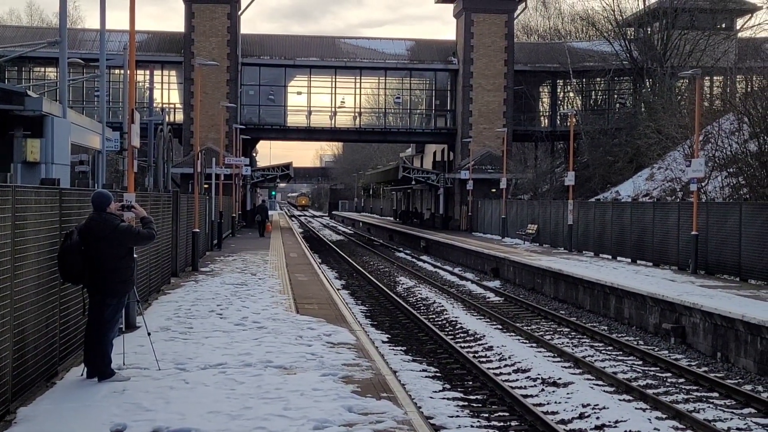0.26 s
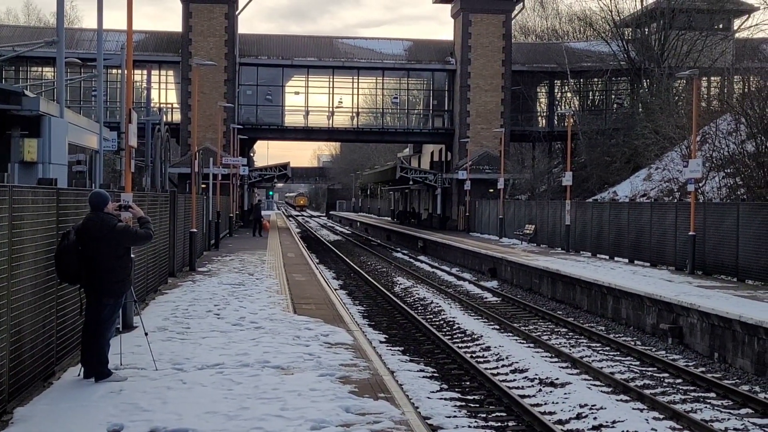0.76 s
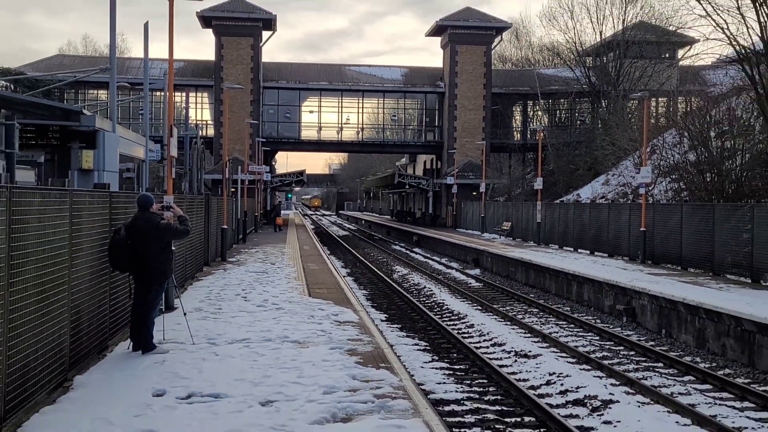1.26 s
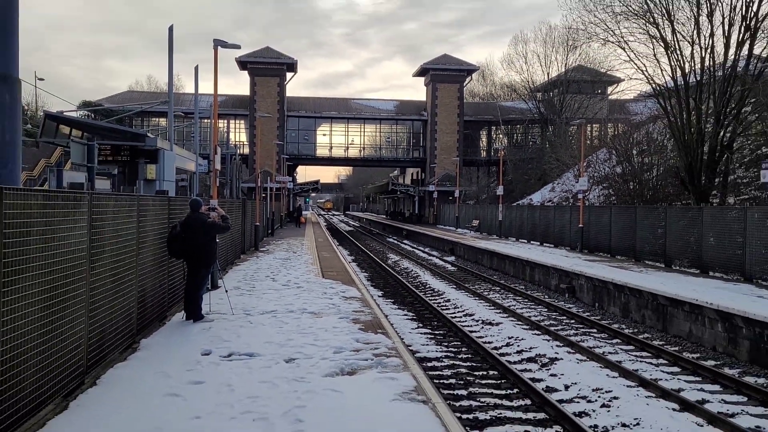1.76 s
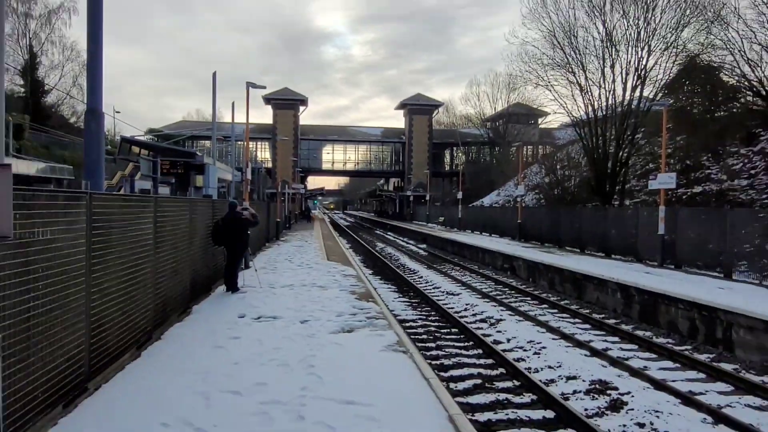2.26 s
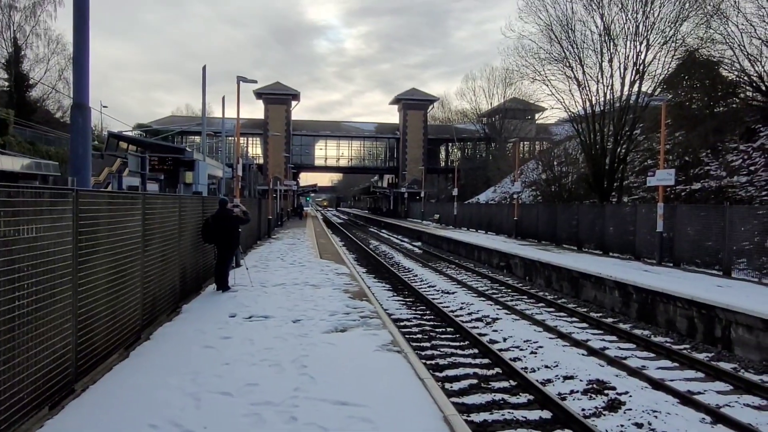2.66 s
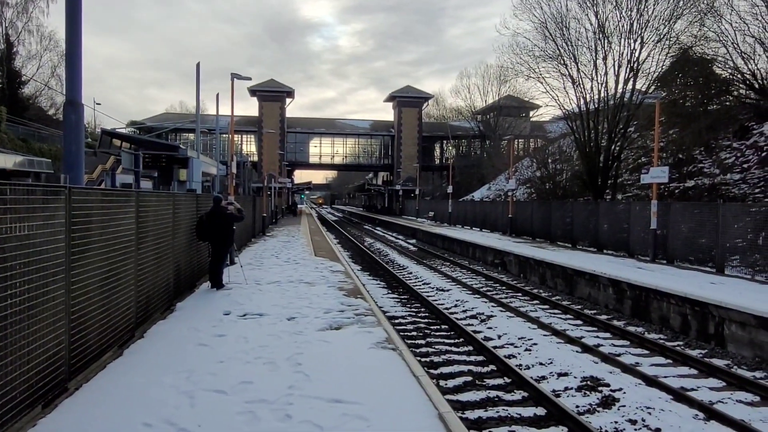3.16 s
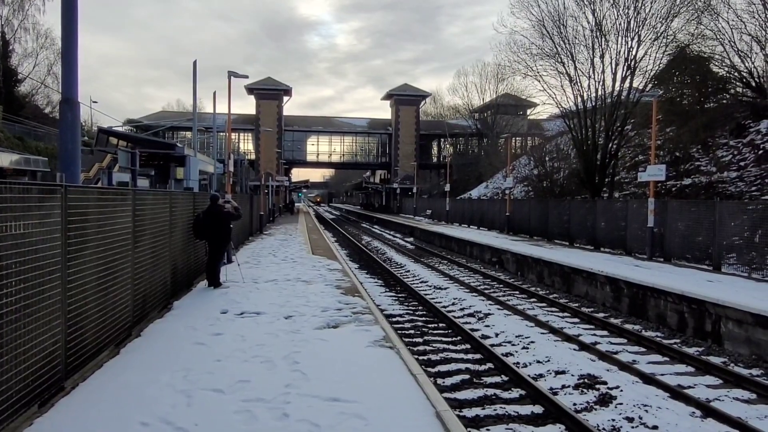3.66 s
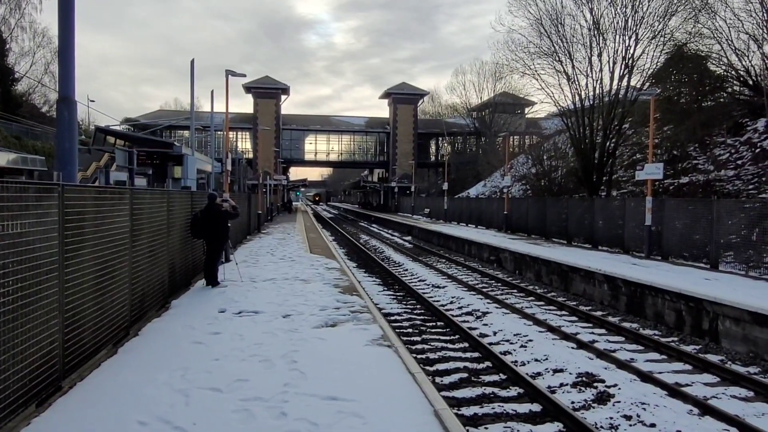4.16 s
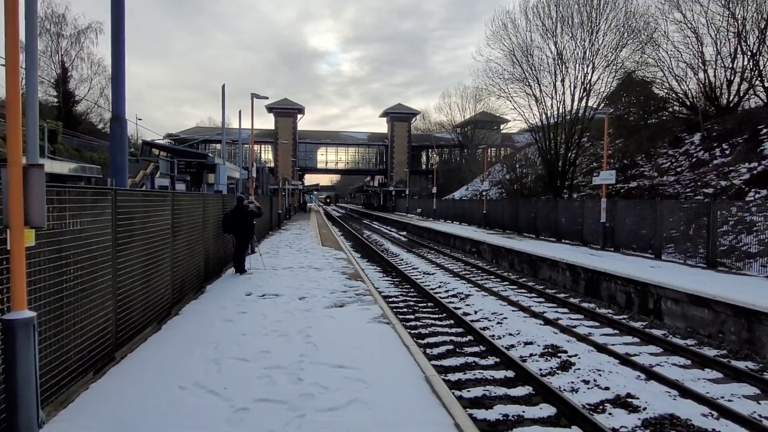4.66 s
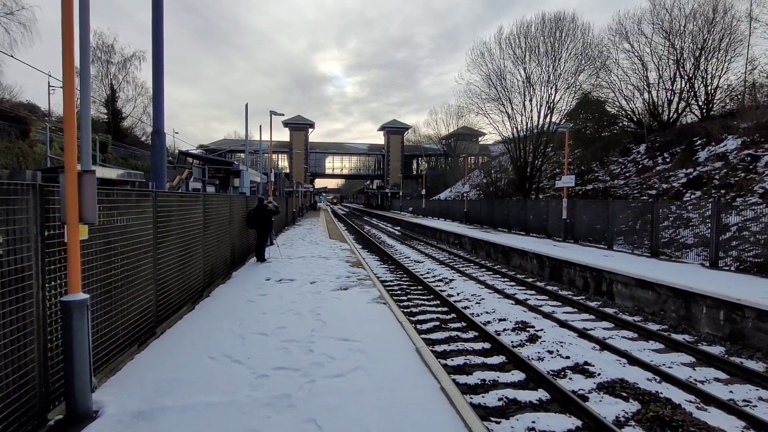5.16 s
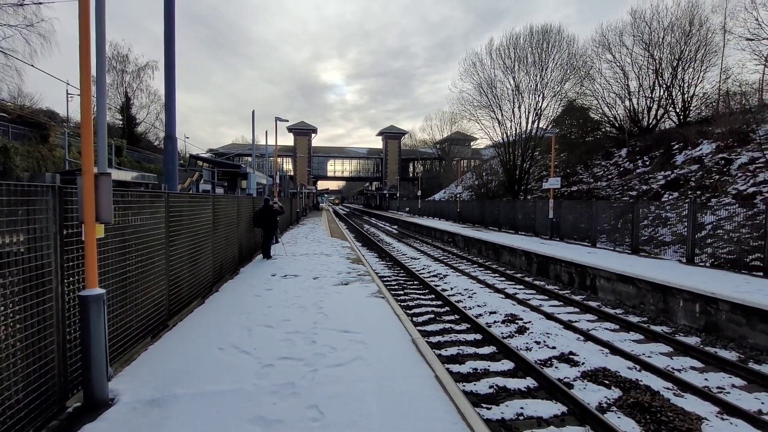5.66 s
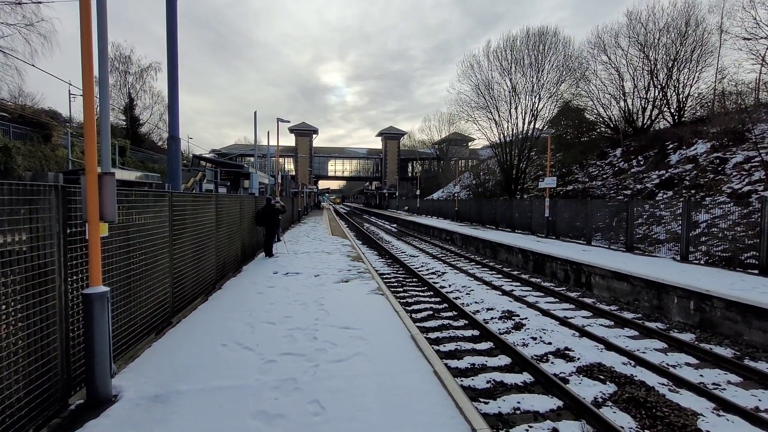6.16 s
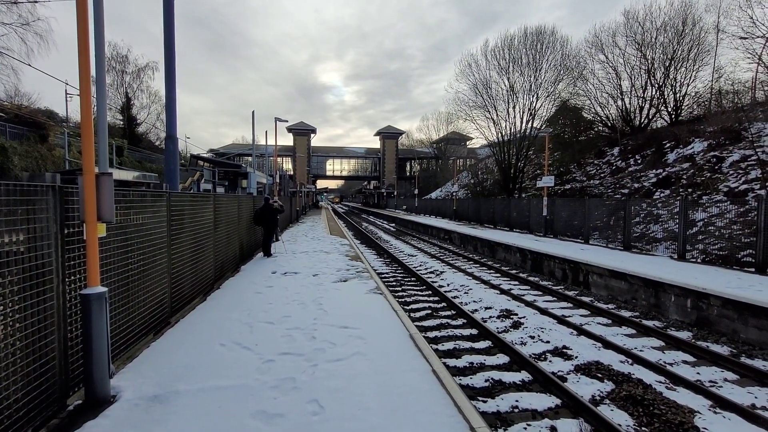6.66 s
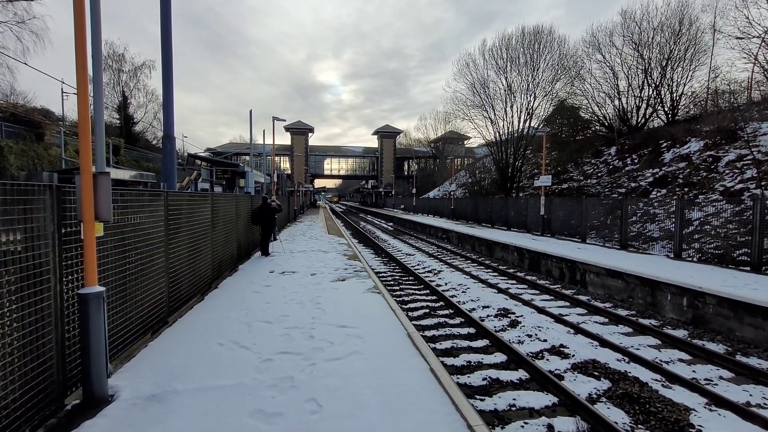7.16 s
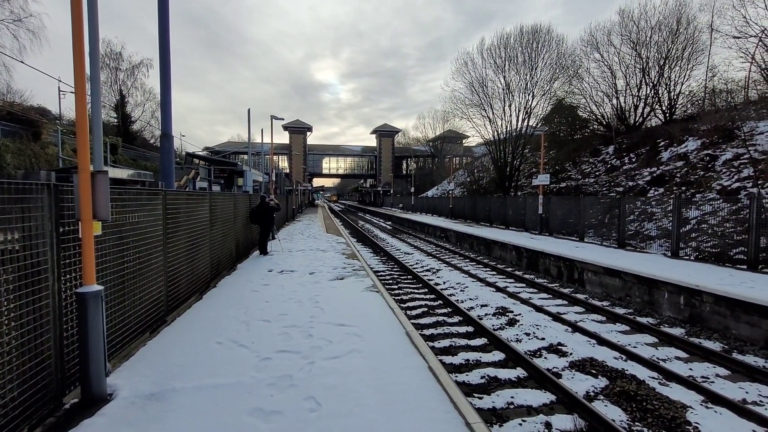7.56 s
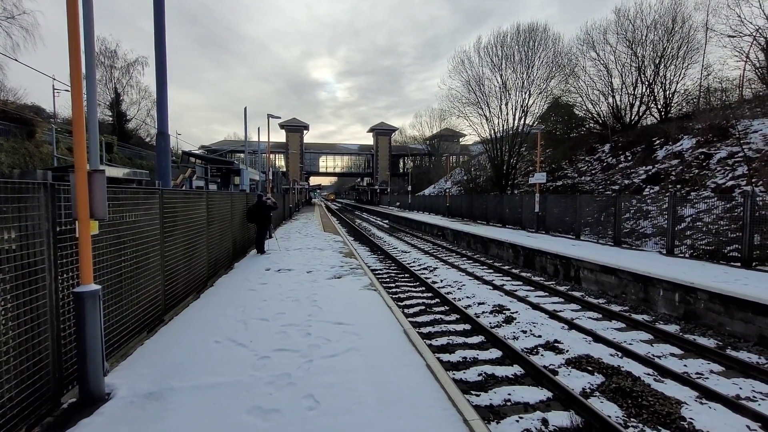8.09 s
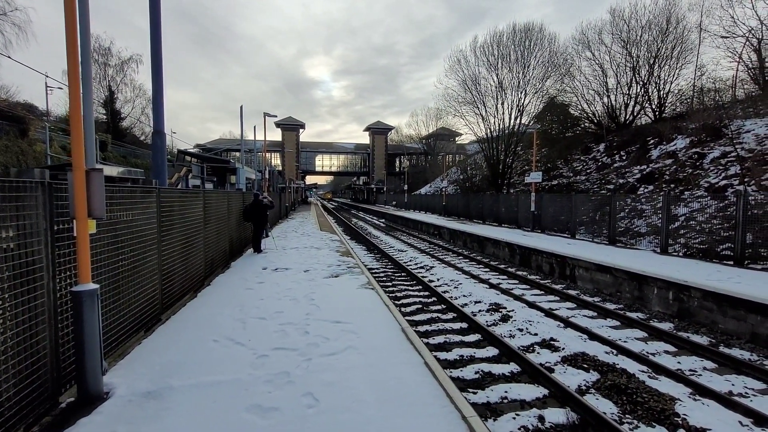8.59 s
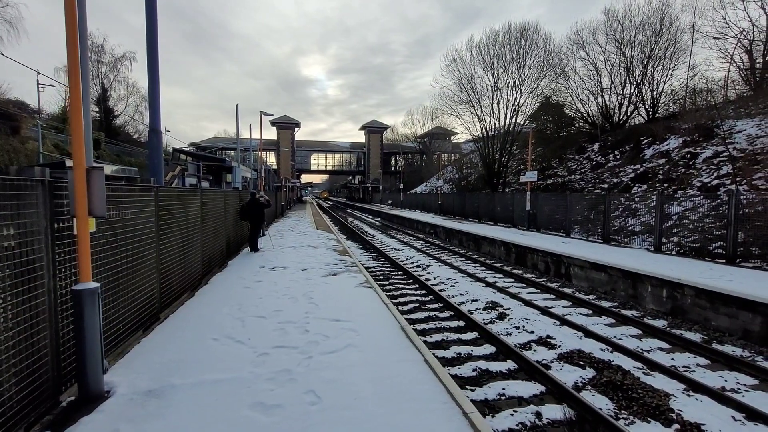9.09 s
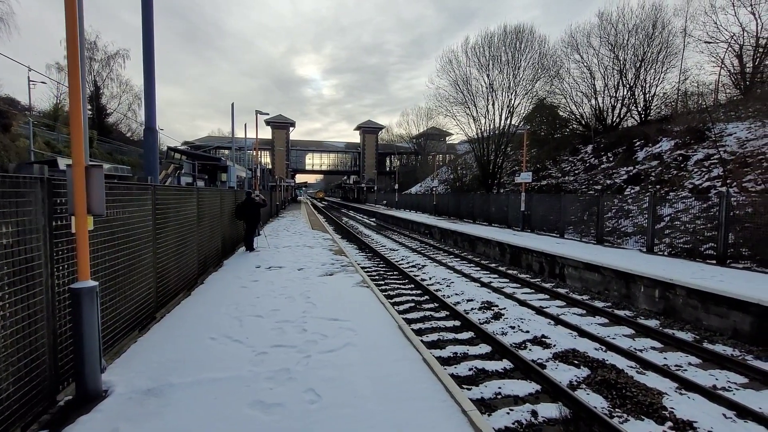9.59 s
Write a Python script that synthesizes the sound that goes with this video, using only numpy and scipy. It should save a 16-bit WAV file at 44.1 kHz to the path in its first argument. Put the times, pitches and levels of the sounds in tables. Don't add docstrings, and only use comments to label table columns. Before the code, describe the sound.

Hard-working train engines approach through an echoing cutting, hoarse pulsing exhaust swelling over bird whistles, clanks and knocks, then a finger bumps the microphone twice.

```python
import sys
import numpy as np
from scipy import signal
from scipy.fft import rfft, irfft, next_fast_len
from scipy.io import wavfile
from scipy.ndimage import uniform_filter1d, map_coordinates

SR = 44100
rng = np.random.default_rng(int(sys.argv[2]) if len(sys.argv) > 2 else 0)


def materialize(psi):
    bounded = np.clip(np.atleast_2d(psi).T, -1, 1)
    quanta = np.round(bounded * 32767).astype(np.int16)
    wavfile.write(sys.argv[1], SR, quanta)


def ratio_of_db(decibels):
    return 10 ** (np.asarray(decibels, float) / 20)


N = 433503


def seconds():
    return np.arange(N) / SR


def unit(x):
    return x / np.sqrt(np.mean(x ** 2) + 1e-20)


def sine(turns):
    return np.sqrt(2) * np.cos((2 * np.pi * (turns % 1)).astype(np.float32))


def along(points, hz):
    point_hz, value = np.transpose(points)
    return np.interp(np.log(hz + 1), np.log(point_hz + 1), value)


def curves(rows):
    start_s, *columns = np.transpose(rows)
    return [np.interp(seconds(), start_s, column) for column in columns]


def wobble(rate):
    count = int(N * rate / SR) + 2
    return np.interp(np.arange(N) * rate / SR, np.arange(count), rng.standard_normal(count))


def filtered(x, response):
    size = next_fast_len(N + 8192)
    return irfft(rfft(x, size) * response(np.fft.rfftfreq(size, 1 / SR)), size)[..., :N]


def rush(spectrum, patchy_db):
    bins = signal.stft(rng.standard_normal((2, N)), nperseg=512)[2]
    field = uniform_filter1d(rng.standard_normal(bins.shape[1:]), size=5, axis=0)
    field = uniform_filter1d(field, size=8, axis=1)
    pair = signal.istft(bins * ratio_of_db(patchy_db * unit(field)), nperseg=512)[1][:, :N]
    points = [(10, -120), *spectrum, (20000, -120)]
    return unit(filtered(pair, lambda hz: ratio_of_db(along(points, hz))))


def orders(multiples, levels, turns, nearness, fade_db):
    out, knots = 0, np.arange(0, N, SR // 10)
    for multiple, (far_db, near_db) in zip(multiples, levels):
        start = rng.random()
        fade = np.interp(knots * 1.3 / SR, np.arange(15), rng.standard_normal(15))
        level_db = far_db + (near_db - far_db) * nearness[knots] + fade_db * fade
        level = np.interp(np.arange(N), knots, ratio_of_db(level_db))
        out = out + level * sine(multiple * turns + start)
    return out


# start_s, lead_clear [0-1], rear_clear [0-1]
BRIDGE_CLEARANCE = [(0, -.2, 0), (2, -.1, 0.3), (3.4, 0.3, .05), (4.3, 0.25, 0.1), (5, 0.38, .05),
                    (5.6, 0.5, 0), (6.3, 0.73, 0), (6.8, 0.9, 0.8), (7.2, 0.85, 0.8), (7.6, 0.9, 0.9),
                    (8.1, 0.9, 0.99), (9, 1.02, 0.5), (9.83, 0.9, 0.2)]
LEAD_MULTIPLES = [8, 10, 11, 12, 13, 14, 15, 16, 17, 18, 19, 21, 22, 23, 24, 25, 28, 29, 30, 31, 33, 34, 35,
                  36, 40, 42, 46]
REAR_MULTIPLES = [6, 18, 22, 32, 34]
# far_db, near_db
LEAD_TONE_LEVELS = [(-49, -50.5), (-53, -45.5), (-54, -41.5), (-54, -44.5), (-58.5, -56.5), (-62.5, -40.5),
                    (-65.5, -48.5), (-55.5, -50), (-51, -46), (-46.5, -35.5), (-59.5, -58.5), (-60, -55.5),
                    (-52, -36), (-51.5, -36), (-61.5, -41.5), (-58, -49), (-67.5, -47), (-59, -37.5),
                    (-58.5, -47.5), (-53.5, -48), (-55.5, -43.5), (-55.5, -45.5), (-52.5, -49.5),
                    (-64.5, -48.5), (-60.5, -53), (-63.5, -53), (-56, -45.5)]
REAR_TONE_LEVELS = [(-66, -59), (-55.5, -39.5), (-59.5, -41.5), (-67, -56), (-57, -39.5)]
# start_s, level_db
LEAD_BOOM = [(0.0, -38), (0.44, -37.5), (1.51, -37.5), (1.78, -41), (2.16, -33.5), (2.71, -39.5),
             (3.01, -35.5), (3.28, -36), (3.55, -34), (4.02, -35), (4.35, -32.5), (4.95, -43.5),
             (5.61, -29), (6.0, -35), (6.8, -29.5), (7.3, -35.5), (7.7, -39.5), (8.5, -35), (9, -43.5),
             (9.83, -44.5)]
# start_s, level_db
LEAD_THUD = [(0, -53), (.9, -49), (2.2, -49.5), (3.3, -47.5), (4.2, -43), (5.3, -44), (6, -40.5),
             (6.9, -46), (7.8, -49), (8.3, -47), (9.83, -43)]
# start_s, level_db
REAR_ENGINE_BOOM = [(0, -59), (2, -50), (3, -54), (4.2, -47.5), (5, -55), (6.1, -49.5), (6.5, -40),
                    (7, -31.5), (7.5, -34), (8.5, -35.5), (9, -42), (9.83, -43.5)]


def exhaust(turns, rear_turns):
    lead_near, rear_near = curves(BRIDGE_CLEARANCE)
    tones = orders(LEAD_MULTIPLES, LEAD_TONE_LEVELS, turns, lead_near, fade_db=1.8)
    tones = tones + orders(REAR_MULTIPLES, REAR_TONE_LEVELS, rear_turns, rear_near, fade_db=3.5)
    for fading, crank in ((LEAD_BOOM, 9 * turns), (LEAD_THUD, 6 * turns), (REAR_ENGINE_BOOM, 9 * rear_turns)):
        tones = tones + ratio_of_db(curves(fading)[0]) * sine(crank)
    longer_path = np.pad(tones, (190, 0), "reflect")[:N]
    return np.array([tones, longer_path])


# start_s, roar_db
EFFORT = [(0, -42.5), (.68, -41), (1.2, -42), (2.05, -41), (2.96, -39), (3.31, -39.5), (3.97, -38),
          (4.71, -36), (5.06, -34.5), (5.67, -32), (6.02, -31.5), (6.43, -34.5), (7.36, -33.5), (8.05, -34),
          (8.71, -32), (9.83, -32.5)]
# start_s, deep_db, bright_db
NOISE_DRIFT = [(0, 0.3, -0.5), (1, 0.6, 1.6), (2, 2.1, 1), (2.9, 0.3, 1.5), (3.6, -1, -0.2),
               (4.2, -1, -0.3), (4.9, 0.3, -3.5), (5.2, 1.1, 1), (6, -0.1, 1.3), (7, 0.5, 0.3),
               (7.6, -0.2, -0.7), (8.3, 1.1, 1.7), (9, 0.5, 0.2), (9.83, -0.8, 1.5)]
# pitch_hz, level_db [dB per Hz]
RUMBLE_COLOUR = [(22, -31.5), (36, -21), (60, -1.5), (95, -8), (150, -1.5), (190, -10.5), (230, -5.5),
                 (290, -8), (400, -14.5), (600, -37.5)]
THROAT_COLOUR = [(250, -31.5), (340, -11.5), (420, -2), (500, 1.5), (600, -9), (750, -27.5)]
ROAR_COLOUR = [(450, -20.5), (600, -1.5), (720, 1.5), (900, -4), (1150, -6.5), (1550, -6.5), (1800, -13.5),
               (2100, -14), (2500, -27.5), (3500, -65)]
CLATTER_COLOUR = [(1800, -26.5), (2400, 3.5), (3200, 1), (4000, -3), (5000, -10), (5700, -18), (6500, -43)]
FIZZ_COLOUR = [(3300, -30), (4000, -3), (4600, -2.5), (5300, -6), (5900, -19.5)]
AIR_COLOUR = [(4800, -26), (5700, 4), (6800, -2.5), (7800, -9), (8400, -25), (9300, -17.5), (9900, -9.5),
              (10500, -29.5), (12000, -39.5)]


def firing_noise(turns):
    angle = 2 * np.pi * (6 * turns + 0.46)
    firing = np.sin(angle) + 0.78 * np.sin(2 * angle)
    uneven = np.cos(angle / 2 + 3.1)
    roar_db, = curves(EFFORT)
    deep_db, bright_db = curves(NOISE_DRIFT)
    surge = wobble(3.8)

    def follow(start_db, per_effort_db, per_s_db):
        return start_db + per_effort_db * (roar_db - roar_db[0]) + per_s_db * seconds()

    rumble_db = follow(-44.5, 0.72, 0.54) + deep_db + 0.86 * wobble(6.0)
    throat_db = follow(-51, 0.78, 1) + deep_db + 2.1 * wobble(2.9) + 0.21 * uneven + 0.11 * wobble(65)
    roar_gate_db = roar_db + 0.3 + 1.1 * firing + 0.7 * uneven + 0.3 * surge + 0.6 * wobble(70)
    clatter_db = follow(-63, 0.61, 0.87) + bright_db + 0.99 * firing + 0.18 * uneven
    clatter_db += 0.35 * surge + 1.5 * wobble(90)
    fizz_db = follow(-80.5, 0.77, 2.06) + bright_db + 1.4 * firing + 0.7 * wobble(80)
    air_db = follow(-91.5, 1.16, 2.52) + 0.9 * firing + 0.73 * wobble(7.8)

    noise = ratio_of_db(rumble_db) * rush(RUMBLE_COLOUR, patchy_db=2.15)
    noise += ratio_of_db(throat_db) * rush(THROAT_COLOUR, patchy_db=0.96)
    noise += ratio_of_db(roar_gate_db) * rush(ROAR_COLOUR, patchy_db=1.5)
    noise += ratio_of_db(clatter_db) * rush(CLATTER_COLOUR, patchy_db=1.5)
    noise += ratio_of_db(fizz_db) * rush(FIZZ_COLOUR, patchy_db=3.5)
    noise += ratio_of_db(air_db) * rush(AIR_COLOUR, patchy_db=3.5)
    return noise


# start_s, rate_hz [cycles a second]
LEAD_CYCLE = [(0, 7.155), (5.6, 7.155), (6.3, 7.147), (9.83, 7.147)]


def engines():
    turns = -0.025 + np.cumsum(curves(LEAD_CYCLE)[0]) / SR
    rear_turns = 0.069 + 6.6 * seconds()
    opening = np.minimum(seconds() / 0.01, 1)
    return opening * (exhaust(turns, rear_turns) + firing_noise(turns))


# start_s, level_db, pitch_hz
TURBO_WHINE = [(0, -81, 4829), (3.5, -75, 4829), (4.4, -71.5, 4829), (5.7, -71.5, 4819), (6.6, -67.5, 4822),
               (7.4, -66.5, 4828), (9, -66, 4828), (9.83, -65, 4822)]


def whine(turns, level_db, blur):
    phase = 2 * np.pi * (turns % 1) + blur + np.array([[0], [1.2]])
    return ratio_of_db(level_db + 2.2 * wobble(9)) * np.sin(phase.astype(np.float32))


def turbos():
    level_db, turbo_hz = curves(TURBO_WHINE)
    t = seconds()
    lead = whine(np.cumsum(turbo_hz) / SR, level_db, 1.1 * wobble(30))
    rear = whine(3651 * t, level_db - 4, 1.1 * wobble(30))
    howl_db = -63 - 6 * ((t - 5.06) / 0.82) ** 2
    gears = whine(3340 * t, howl_db, 1.8 * wobble(260))
    return np.sqrt(2) * (lead + rear + gears)


# pitch_hz, level_db
HISS_COLOUR = [(100, -10), (4000, -2), (8000, 0), (15500, 3)]


def phone_hiss():
    return ratio_of_db(-81.5 - 0.3 * seconds()) * rush(HISS_COLOUR, patchy_db=1.2)


def blows(events, trim_db, t60):
    out, t = np.zeros(N + SR), np.arange(SR // 10) / SR
    for start_s, peak_db, pitch_hz in events:
        swell = 1 - np.exp(-t / 0.0012)
        ring = np.sin(2 * np.pi * pitch_hz * t) * ratio_of_db(peak_db + trim_db - 60 * t / t60) * swell
        out[round(start_s * SR):][:len(t)] += ring
    direct = out[:N]
    return np.array([direct, np.roll(direct, 170)])


# start_s, peak_db, pitch_hz
COUPLING_CLINKS = [(0.4544, -33.5, 1405), (0.615, -35.5, 1480), (3.69, -27, 1600), (4.0677, -37, 1320),
                   (5.1627, -25, 1530), (5.1836, -27, 1400), (5.2086, -27.5, 1350), (5.278, -29.5, 1410),
                   (5.3023, -35, 1360), (5.4645, -42, 1470), (5.8217, -24.5, 1384), (5.9738, -28, 1470),
                   (6.3, -32, 1430), (6.535, -30, 1480), (6.558, -36, 1410), (6.6716, -33, 1640),
                   (6.721, -28.5, 1356), (6.999, -26.5, 1570), (7.467, -27, 1440), (8.3055, -27, 1447),
                   (0.72, -34.5, 1680), (2.5, -32.5, 1600), (2.9, -31, 1120), (3.135, -28.5, 1630),
                   (3.25, -31.5, 1570), (3.47, -32, 1430)]
# start_s, peak_db, pitch_hz
COUPLING_PINGS = [(4.6505, -50, 3130), (4.7887, -42, 2850), (5.1896, -44, 3340), (5.3923, -45, 3150),
                  (5.8922, -45, 3120), (6.0194, -41, 2850), (6.0483, -39, 3330), (6.164, -51, 3080),
                  (6.184, -36, 3070), (6.605, -45, 3130)]


def couplings():
    return blows(COUPLING_CLINKS, trim_db=6.0, t60=0.026) + blows(COUPLING_PINGS, trim_db=4.5, t60=0.041)


def whistle(notes, shift_s, pace):
    out = np.zeros(N + SR)
    flutter, quaver = ratio_of_db(2.5 * wobble(90)), 1 + 0.007 * wobble(150)
    for start_s, length_s, start_hz, mid_hz, end_hz, level_db in notes:
        u = np.linspace(0, 1, round(length_s * SR))
        at = round((start_s * pace + shift_s) * SR)
        hz = start_hz * (1 - u) * (1 - 2 * u) + 4 * mid_hz * u * (1 - u) + end_hz * u * (2 * u - 1)
        tone = np.sin(2 * np.pi * np.cumsum(hz * quaver[at:][:len(u)]) / SR)
        swell = np.abs(np.sin(np.pi * u)) ** 0.32
        out[at:][:len(u)] += ratio_of_db(level_db + 1.0) * swell * tone
    return out[:N] * flutter


def cutting(x, t60):
    t, out = np.arange(SR // 2) / SR, np.zeros((2, N + SR))
    first, last = np.flatnonzero(x)[[0, -1]]
    tail = rng.standard_normal((2, len(t))) * ratio_of_db(-60 * t / t60) * (1 - np.exp(-t / 0.012))
    echo = signal.fftconvolve(x[None, first:last], tail / np.linalg.norm(tail[0]), axes=1)
    out[:, first:first + echo.shape[1]] = echo
    return out[:, :N]


# start_s, length_s, start_hz, end_hz, level_db
GLIDING_NOTES = [(1.238, .026, 4400, 3600, -61), (1.476, .013, 4300, 5250, -56),
                 (1.712, .013, 6300, 5880, -62), (1.726, .013, 6300, 5880, -62),
                 (1.74, .048, 7050, 5700, -61), (1.82, .012, 5000, 5900, -60),
                 (2.112, .014, 4800, 4250, -61), (2.186, .07, 5250, 4420, -52),
                 (2.44, .08, 5580, 5000, -58), (2.686, .021, 4000, 5100, -56),
                 (2.707, .009, 5000, 4500, -54), (2.716, .02, 4300, 5050, -55),
                 (2.752, .013, 4300, 5200, -59), (2.765, .021, 5250, 4200, -56),
                 (2.833, .01, 4900, 4300, -53)]
# start_s, length_s, top_hz, depth_hz, level_db
ARCHED_NOTES = [(1, .1, 5180, 110, -59), (1.451, .025, 4900, 620, -56), (1.489, .03, 5260, 60, -57),
                (1.558, .024, 5500, 800, -56), (1.588, .026, 5250, 1100, -52),
                (1.806, .015, 4950, 250, -55), (1.861, .04, 5480, 260, -58), (1.95, .035, 4450, 600, -57),
                (2.126, .025, 4870, 50, -60), (2.345, .025, 5960, 300, -67), (2.358, .08, 5590, 220, -60)]
# start_s, length_s, start_hz, end_hz, level_db
HOOKED_NOTES = [(1.405, .043, 6420, 5000, -60), (1.832, .028, 5950, 5200, -59),
                (1.987, .016, 4450, 3850, -59), (2.012, .034, 4800, 3600, -56),
                (2.082, .025, 4850, 3700, -56)]
# start_s, length_s, start_hz, mid_hz, end_hz, level_db
FIRST_FLOURISH = (1.623, .035, 4150, 4560, 4080, -53)
# first_db, second_db
NOTE_STRESS = [(1, -6), (2, -1), (1, 2), (1, 1), (0, -0.5), (-3, 6), (-4, 3), (1, 3.5), (-1, 0), (0, 4),
               (2, 2), (-1, 0), (-1, -3), (-1, 4), (-2.5, -6), (2, 3.5), (1, 0), (-1, -3), (-4, 1), (2, 3),
               (0, 3), (1, 1), (-1, -4), (-1, 0), (-1, 5), (-2, 5), (0.5, 0.5), (0, 1.5), (0, -2), (0, 3),
               (-3.5, -2)]
# shift_s, pace [ratio], level_db, echo_db, pan_db [left minus right]
SINGINGS = [
    (0, 1, 1.5, 2, -4),
    (5.828, .975, 4.5, -2.5, 3),
]


def songbird():
    phrase = [(s, length, a, (a + b) / 2, b, db) for s, length, a, b, db in GLIDING_NOTES]
    phrase += [(s, length, top - depth, top, top - depth, db) for s, length, top, depth, db in ARCHED_NOTES]
    phrase += [(s, length, a, a - 0.2 * (a - b), b, db) for s, length, a, b, db in HOOKED_NOTES]
    shimmer = ratio_of_db(3 * np.array([wobble(110), wobble(110)]) - 1)
    out = np.zeros((2, N))
    for (shift_s, pace, level_db, echo_db, pan_db), stress in zip(SINGINGS, np.transpose(NOTE_STRESS)):
        sung = [(*note[:-1], note[-1] + more_db) for note, more_db in zip(phrase, stress)]
        if shift_s == 0:
            sung.append(FIRST_FLOURISH)
        pan = ratio_of_db([[-3 + pan_db / 2], [-3 - pan_db / 2]])
        for k in range(3):
            song = ratio_of_db(level_db) * whistle(sung[k::3], shift_s, pace)
            out += pan * song + ratio_of_db(echo_db) * shimmer * cutting(song, t60=0.62)
    return out


# start_s, level_db, count [calls]
CALL_GROUPS = [
    (1.33, -79, 3),
    (4.345, -76.5, 3),
    (7.83, -76, 1),
]


def calling_bird():
    notes = []
    for start_s, level_db, count in CALL_GROUPS:
        for k in range(count):
            start_hz = 7900 - 290 * k * k
            mid_hz = start_hz - 0.26 * 1300
            end_hz = 7900 - 1300 - 290 * k
            notes.append((start_s + k * 0.152, 0.047, start_hz, mid_hz, end_hz, level_db - 1.2 * k))
    calls = ratio_of_db(4) * whistle(notes, 0, 1)
    return calls + ratio_of_db(-3) * cutting(calls, t60=0.7)


# start_s, peak_db, pitch_hz
RAIL_JOINTS = [(3.0194, -38, 1650), (3.1782, -33.5, 2030), (3.3912, -37, 2000), (3.8322, -35, 1860),
               (4.0153, -37, 1715), (4.1555, -34, 2040), (4.2951, -33.5, 1660), (4.574, -45, 1920),
               (4.7436, -36, 1760), (5.2121, -34, 2030), (5.2744, -29, 2050), (5.4849, -33.5, 1980),
               (5.9738, -32, 1710), (6.8144, -31.5, 1940), (5.161, -40, 1970), (5.3166, -40, 1940),
               (5.4119, -37.5, 1950), (5.5451, -35, 1910), (5.63, -35.5, 1950), (5.6813, -39, 1900),
               (5.8344, -37, 1850), (6.029, -36.5, 1760), (6.1592, -38, 1890)]


def rail_joints():
    return blows(RAIL_JOINTS, trim_db=5.5, t60=0.036)


# start_s, peak_db, pitch_hz
COMBUSTION_KNOCKS = [(4.274, -20.5, 772), (4.303, -23, 800), (4.395, -24.5, 864), (4.766, -32.5, 735),
                     (4.841, -30, 593), (5.089, -20, 770), (5.183, -18.5, 762), (5.207, -20, 832),
                     (5.231, -16.5, 854), (5.258, -16.5, 746), (5.463, -20.5, 876), (5.631, -20.5, 847),
                     (5.823, -22, 610), (5.97, -16, 557), (6.766, -23, 746), (6.935, -21, 660),
                     (7.092, -22, 856), (7.424, -18, 742), (7.894, -24, 662), (8.241, -22, 696),
                     (8.33, -19, 488), (8.482, -18, 673), (8.894, -17, 655), (9.197, -17, 633),
                     (9.649, -26, 624), (9.759, -16, 674), (4.57, -23.5, 605), (4.715, -22.5, 670),
                     (4.98, -21.5, 556), (5.401, -32, 700), (6.376, -21.5, 547), (7.133, -20, 693),
                     (7.188, -25, 740), (7.498, -26.5, 727), (8.429, -21, 684), (8.586, -24, 650),
                     (8.8, -25, 710)]


def combustion_knocks():
    return blows(COMBUSTION_KNOCKS, trim_db=-3.5, t60=0.069)


# start_s, peak_db, case_hz, rustle_db, softness_s
FINGER_TAPS = [
    (8.8563, -6.2, 756, -59, .0011),
    (9.412, -1.9, 596, -51, .0021),
]
# ratio [multiple of case_hz], level_db, t60_s
CASE_MODES = [(.54, -27.5, .028), (1.11, 9, .0042), (.9, -16, .0055), (1.62, -21, .011)]
# pitch_hz, level_db [dB per Hz]
GLOVE_COLOUR = [(3000, -35), (5500, -5.5), (7300, 2), (9000, -15), (13000, -3.5), (15500, -7)]


def taps():
    thump, rub, t = np.zeros(N + SR), np.zeros(N + SR), np.arange(SR // 5) / SR
    for start_s, peak_db, case_hz, rustle_db, softness_s in FINGER_TAPS:
        ring = 0
        for ratio, level_db, t60 in CASE_MODES:
            ring = ring + ratio_of_db(level_db - 60 * t / t60) * np.sin(2 * np.pi * ratio * case_hz * t)
        ring = (1 - np.exp(-t / softness_s)) ** 2 * ring
        thump[round(start_s * SR) + SR // 1000:][:len(t)] += ratio_of_db(peak_db) * ring / np.abs(ring).max()
        stroke = ratio_of_db(rustle_db - 60 * (t / 0.18) ** 2) * (1 - np.exp(-t / 0.003))
        rub[round((start_s + 0.008) * SR):][:len(t)] += stroke
    rustle = rub[:N] * ratio_of_db(3.5 * wobble(140)) * rush(GLOVE_COLOUR, patchy_db=-3.5)
    return ratio_of_db([[-1.5], [1.5]]) * thump[:N] + rustle


# pitch_hz, likeness [0-1]
PORT_LIKENESS = [(60, 1), (300, 0.91), (700, 0.96), (1400, 0.62), (2500, 0.64), (4000, .35), (8000, 0.6)]
# pitch_hz, level_db
PORT_TILT = [(40, -3), (130, 0.1), (290, -3), (640, -1), (1410, -7.5), (3100, 3.5), (6000, -4.5), (9000, 0),
             (15000, 2)]
# pitch_hz, phase_rad
PORT_PHASE = [(40, -0.38), (70, -0.3), (160, -0.08), (300, -0.05), (1380, 0.43), (1720, 0.3), (1980, 1.08),
              (2670, 1.9), (3700, 0.5), (4300, -0.6), (8000, 2.5)]


def ports(pair):
    def spread(hz):
        angle = np.arccos(np.clip(along(PORT_LIKENESS, hz), 0, 1)) / 2
        return np.array([np.cos(angle), np.sin(angle)])

    def balance(hz):
        half = ratio_of_db(along(PORT_TILT, hz) / 2) * np.exp(0.5j * along(PORT_PHASE, hz))
        return np.array([half, 1 / half])

    mid, side = filtered(pair, spread)
    left, right = filtered(np.array([mid + side, mid - side]), balance)
    lag = -0.63 + 0.32 * seconds()
    return np.array([left, map_coordinates(right, [np.arange(N) - lag], mode="nearest")])


def scene():
    train = engines() + couplings() + rail_joints() + combustion_knocks()
    return ports(train) + turbos() + songbird() + calling_bird() + taps()


def band_limit(x):
    return signal.sosfilt(signal.butter(12, 15680, fs=SR, output="sos"), x)


def record(dry):
    mix = dry + phone_hiss()
    return band_limit(mix)


dry = scene()
out = record(dry)
materialize(out)
```